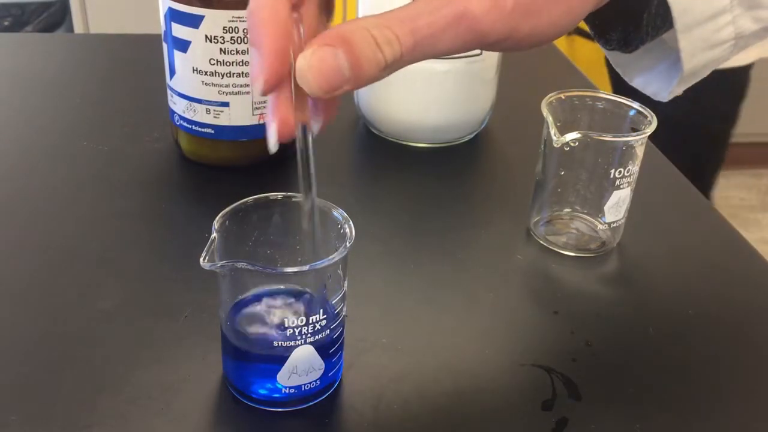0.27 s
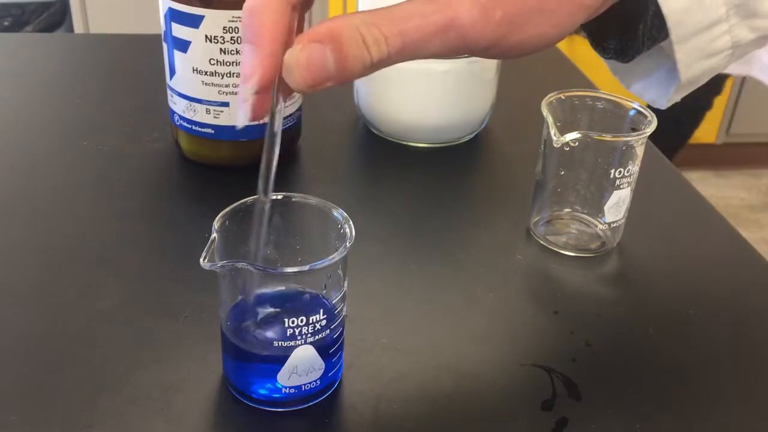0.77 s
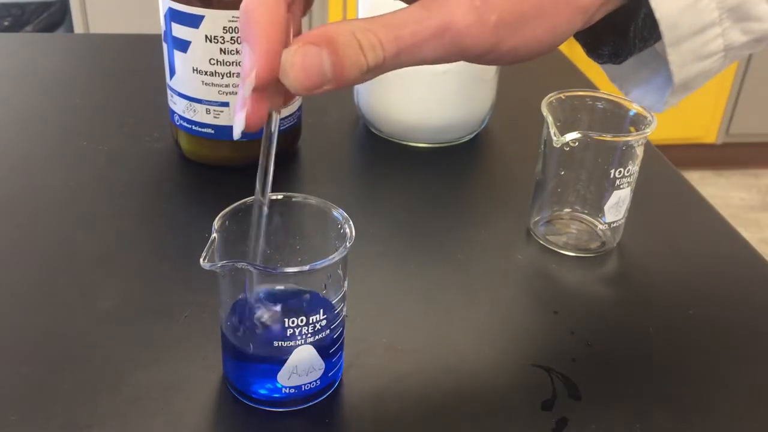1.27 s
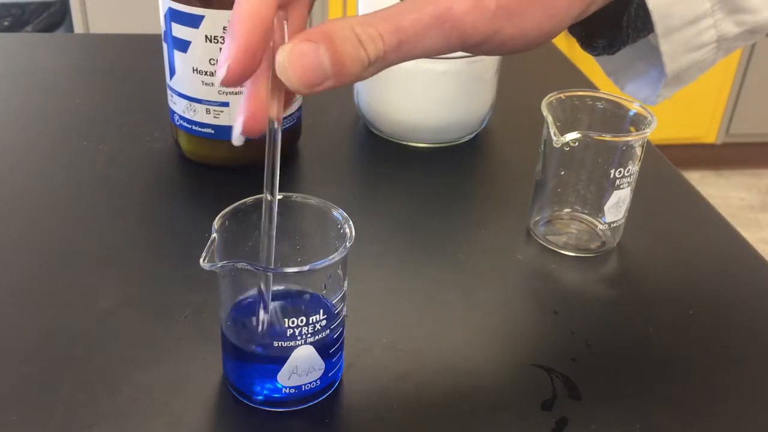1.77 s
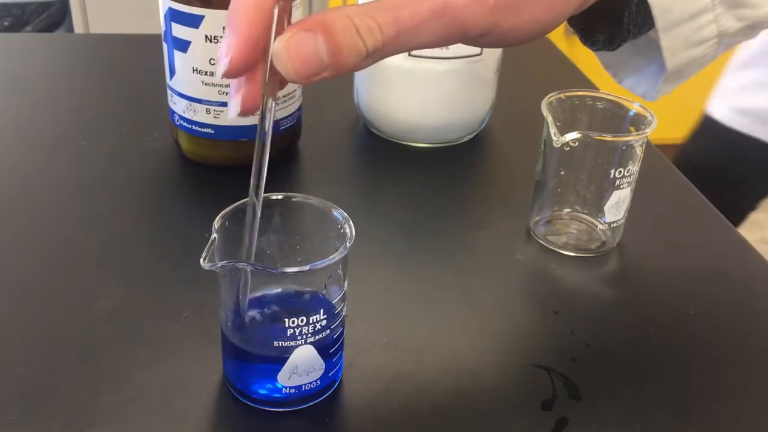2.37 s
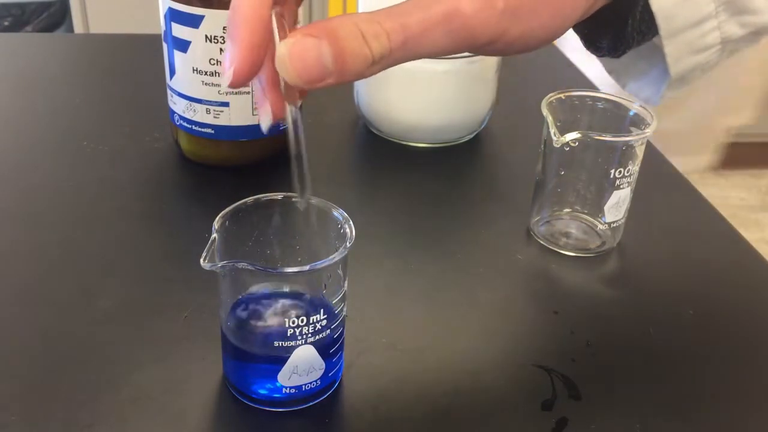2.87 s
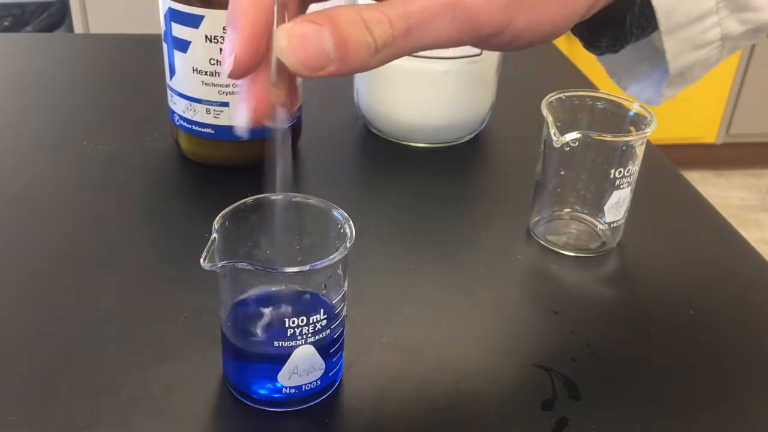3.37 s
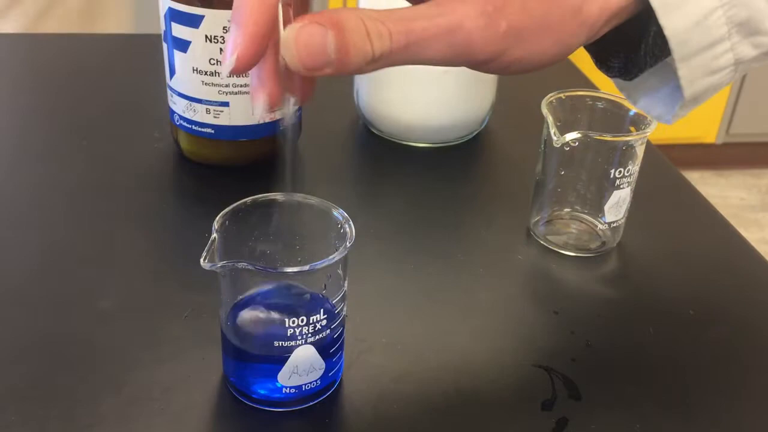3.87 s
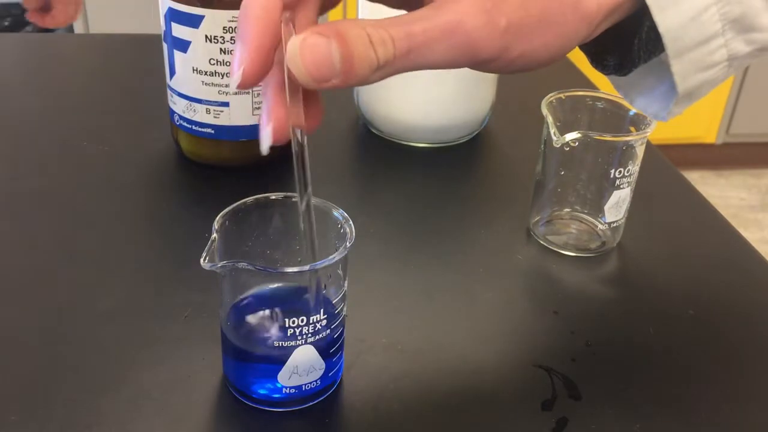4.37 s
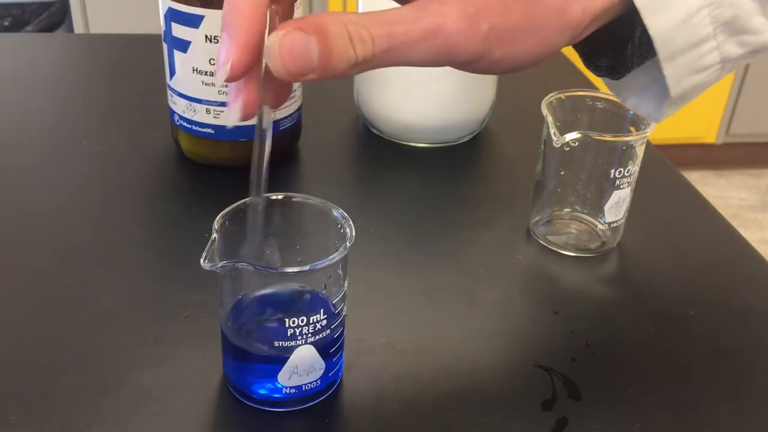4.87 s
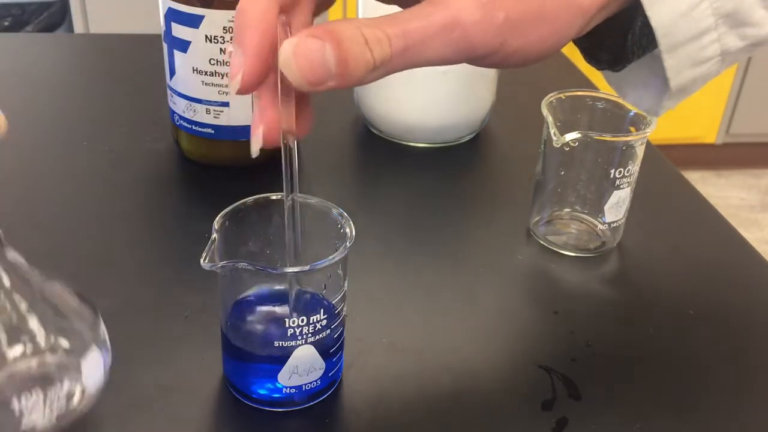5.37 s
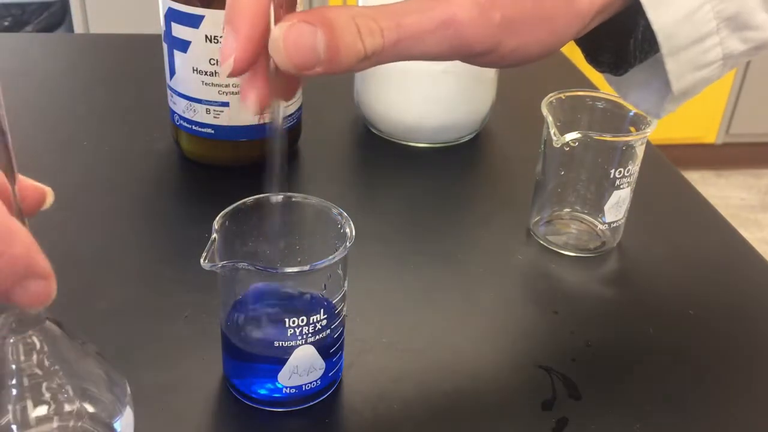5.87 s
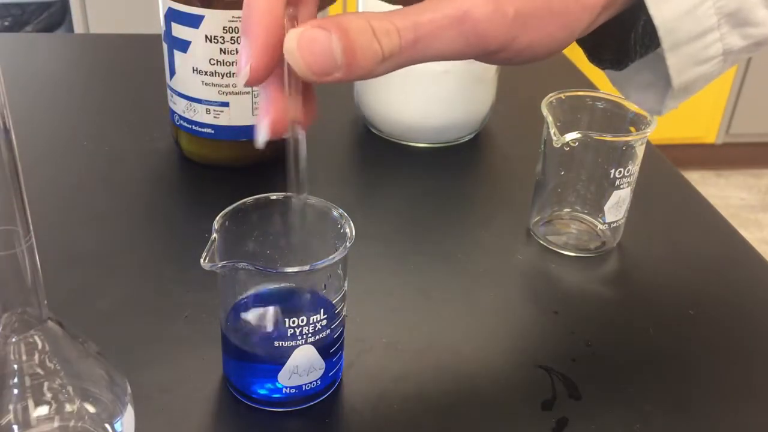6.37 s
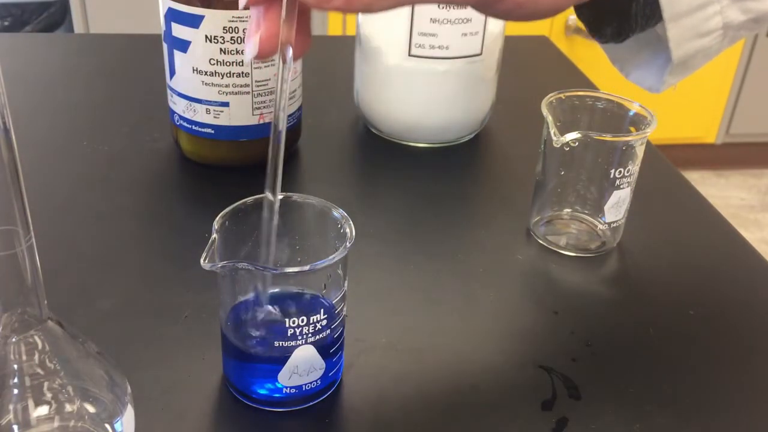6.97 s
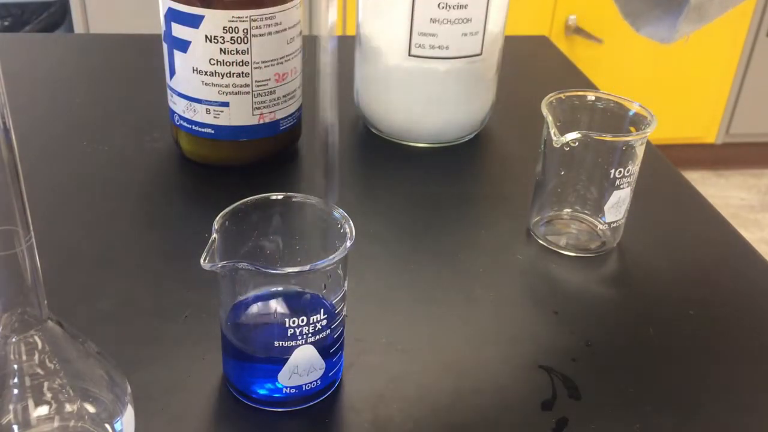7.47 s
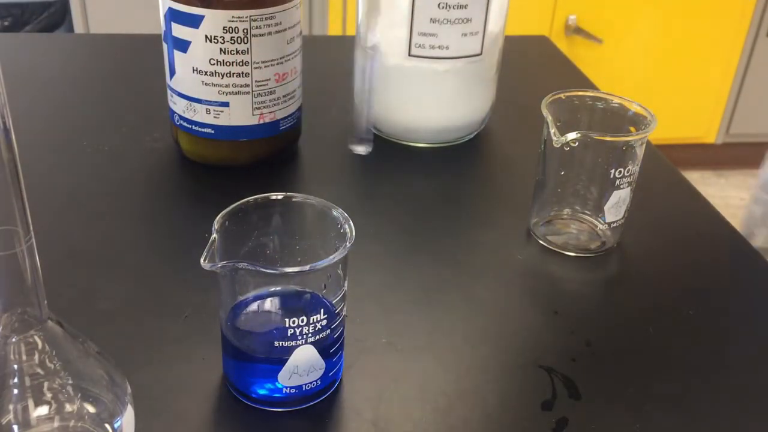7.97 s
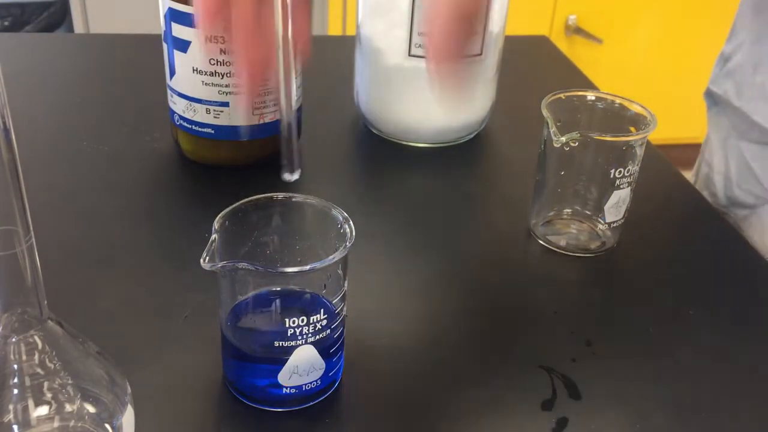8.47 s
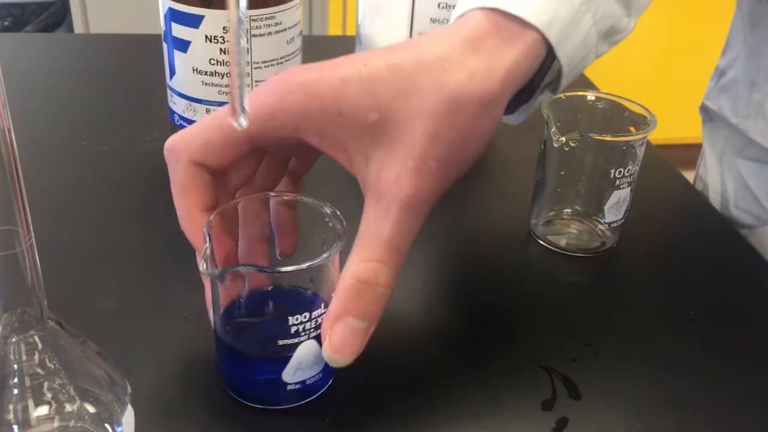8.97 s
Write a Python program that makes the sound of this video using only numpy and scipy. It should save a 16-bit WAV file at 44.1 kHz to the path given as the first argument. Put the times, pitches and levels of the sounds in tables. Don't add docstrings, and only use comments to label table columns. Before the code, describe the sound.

A glass rod clinks brightly and irregularly inside a liquid-filled beaker, then a glass flask lands hard and rocks on a bench in a humming lab.

```python
import sys
import numpy as np
from scipy import signal
from scipy.io import wavfile
from scipy.ndimage import uniform_filter1d

SR = 44100
rng = np.random.default_rng(int(sys.argv[2]) if len(sys.argv) > 2 else 0)


def volts_from_decibels(level):
    exponent = np.asarray(level, float) / 20
    return 10 ** exponent


def inscribe(sig):
    pcm = np.round(np.clip(np.atleast_2d(sig).T, -1, 1) * 32767)
    wavfile.write(sys.argv[1], SR, pcm.astype(np.int16))


N = 406602


def band(x, hz, octaves):
    edges = hz * 2 ** (-octaves / 2), min(hz * 2 ** (octaves / 2), .45 * SR)
    return signal.sosfilt(signal.butter(2, edges, "bandpass", fs=SR, output="sos"), x)


def walk(rate):
    hold = int(SR / rate)
    steps = np.repeat(rng.standard_normal(N // hold + 1), hold)
    return 1.4 * uniform_filter1d(uniform_filter1d(steps, hold), hold)[:N]


def wobble(x):
    return x * volts_from_decibels(4 * walk(110))


def lay(s, rows):
    where = np.minimum((s * SR).astype(int)[:, None] + np.arange(rows.shape[1]), N - 1)
    never_silent = np.resize([1e-14, 1e-14, -1e-14, -1e-14], N)
    return np.bincount(where.ravel(), rows.ravel(), N) + never_silent


def strike(s, db, ms, modes, scatter_db):
    n = np.arange(400)
    fade = np.exp(-(n * 1000 / SR / np.clip(ms, .05, 4)) ** 2)
    push = rng.standard_normal((len(s), len(n))) * fade
    luck = np.clip(rng.standard_normal((len(s), len(modes))), -1.5, 1.5)
    out = np.zeros(N)
    for (hz, mode_db, t60), chance in zip(modes, luck.T):
        radius = np.exp(-np.log(1000) / (max(t60, .003) * SR))
        w = 2 * np.pi * hz / SR
        content = np.abs(push @ np.exp(1j * w * n)) + .3 * np.sqrt(np.sum(push ** 2, axis=1))
        gain = volts_from_decibels(db + mode_db + scatter_db * chance) / content
        force = lay(s, push * gain[:, None])
        out += signal.lfilter([.5, 0, -.5], [1, -2 * radius * np.cos(w), radius * radius], force)
    return out


def choked(s, db, hz, mode_db, rise_ms, choke_ms, fade_s, size=600):
    t = np.arange(size) / SR
    luck = rng.random((len(s), np.shape(hz)[-1] + 1, 3))
    pitch = hz * (1 + .006 * (luck[:, 1:, 0] - .5))
    gain = volts_from_decibels(mode_db + 4 * (luck[:, 1:, 1] - .5))
    waves = np.sin(2 * np.pi * (pitch[..., None] * t + .15 * luck[:, 1:, 2:]))
    ring = np.sum(gain[..., None] * waves, axis=1)
    choke = choke_ms * (0.93 + 0.53 * luck[:, 0, :1])
    ring *= (1 - np.exp(-1000 * t / rise_ms)) * np.exp(-(1000 * t / choke) ** 6 - t / fade_s)
    return lay(s, ring / np.abs(ring).max(axis=1, keepdims=True) * volts_from_decibels(db)[:, None])


def burst(s, db, rise_ms, t60, hz, octaves):
    t = np.arange(SR // 4) / SR
    decay_s = np.clip(t60 + 0 * s, .01, .4)[:, None]
    shape = (1 - np.exp(-1000 * t / rise_ms)) * np.exp(-np.log(1000) * t / decay_s)
    grain = rng.standard_normal(N) * volts_from_decibels(3 * walk(200))
    body = band(band(grain * lay(s, shape * volts_from_decibels(db)[:, None]), hz, octaves), hz, octaves)
    return body * np.sqrt(SR / (hz * octaves))


# [f/Hz, t60/s]
ROOM_DECAY = [(300, 0.27), (1000, 0.45), (3000, 0.25), (7000, 0.4), (13000, 0.25)]


def room(x):
    t = np.arange(SR // 2) / SR

    def tail_band(hz, t60, octaves):
        return band(rng.standard_normal(len(t)), hz, octaves) * np.exp(-np.log(1000) * t / t60)

    tail = 30 * sum(tail_band(hz, t60, 1.57) / np.sqrt(hz) for hz, t60 in ROOM_DECAY[:2])
    tail = tail + sum(tail_band(hz, t60, 0.68) for hz, t60 in ROOM_DECAY[2:])
    tail *= np.clip(t / 0.00021, 0, 1)
    return signal.fftconvolve(x, tail / np.sqrt(np.sum(tail ** 2)))[:N]


# [f/Hz, level/dB per Hz]
AIR_SPECTRUM = [(30, -19), (48, -7.5), (121, -2), (208, -10), (553, -31), (900, -28), (4020, -36.5),
                (15200, -46.5)]
# [f/Hz, level/dB]
FAN_LINES = [(63, -65), (120, -65), (204, -68)]


def ventilation():
    hz, db = np.transpose(AIR_SPECTRUM)
    out, swell, gust = 0, walk(1.1), walk(9.5)
    for centre in 30 * 2 ** np.arange(0, 9.2, .5):
        shape_db = np.interp(np.log(centre), np.log(hz), db) + .8 * swell + 3.9 * walk(1.9)
        if centre < 300:
            shape_db += 2.4 * walk(10) + 2.1 * gust
        out = out + volts_from_decibels(shape_db) * band(rng.standard_normal(N), centre, 0.48)
    out *= volts_from_decibels(-56.5) / np.sqrt(np.mean(out ** 2))
    for line_hz, line_db in FAN_LINES:
        phase = 2 * np.pi * np.cumsum(line_hz * (1 + 0.05 * walk(14))) / SR
        out += np.sqrt(2) * volts_from_decibels(line_db + 3 * walk(11)) * np.sin(phase)
    return out


# [t/s, middle level/dB, low level/dB, high level/dB, t60/s]
FAR_KNOCKS = [(0.015, -52, -46.5, -82, 0.043), (0.465, -43, -33.5, -51, 0.077),
              (0.547, -65, -41.5, -70, 0.072), (0.664, -45, -42.5, -57, 0.16),
              (1.219, -72, -86, -61, 0.096), (1.868, -51, -61, -70, 0.075), (2.583, -64, -53, -49, 0.061),
              (2.818, -60, -84, -57, 0.052), (3.076, -58.5, -58, -90, 0.11),
              (3.372, -44.5, -52, -63, 0.074), (3.882, -51, -58, -82, 0.055),
              (4.024, -46, -56.5, -69, 0.059), (4.344, -53, -50.5, -89.5, 0.044),
              (4.503, -46.5, -62, -65, 0.13), (7.2, -78.5, -69.5, -74, 0.15), (7.501, -55.5, -63, -86, 0.1),
              (7.928, -53.5, -67, -76.5, 0.061), (8.677, -36, -44, -76, 0.079), (8.73, -48, -47, -90, 0.11),
              (9.021, -54, -54, -86, 0.062), (9.046, -35.5, -49.5, -80.5, 0.07),
              (9.119, -67, -62.5, -89.5, 0.11)]
# [f/Hz, level/dB, t60/s]
KNOCK_MODES = [(981, -2, 0.06), (1034, -8, 0.03), (1469, -6, 0.12), (1513, -1.5, 0.04), (1199, -10, 0.011),
               (762, -1.5, 0.033), (633, -10, 0.094), (3457, 3, 0.0051)]


def bumps():
    s, mid_db, low_db, high_db, t60 = np.transpose(FAR_KNOCKS)
    out = burst(s, low_db - 8.5, 8.9, 2.3 * t60, 200, 2.1)
    out += burst(s, mid_db - 7.0, 5.5, t60, 885, 1.7)
    out += burst(s, high_db - 4.5, 0.75, 2.1 * t60, 3500, 0.71)
    out += burst(s, mid_db - 18.0, 3.6, 1.2 * t60, 2500, 0.78)
    out += burst(s, high_db - 11, 1.8, 2.5 * t60, 7720, 1.0)
    return out + wobble(strike(s, mid_db - 18, 4.2, KNOCK_MODES, 3))


# [t/s, f/Hz, level/dB, t60/s]
FAR_GLASS = [
    (0.47, 2500, -55, 0.14),
    (.471, 2700, -73, 0.17),
    (1.6, 5400, -66, 0.13),
    (2.815, 4040, -60.5, 0.81),
    (4.03, 4080, -70, 0.21),
    (4.19, 8000, -80, 0.12),
    (7.2, 4000, -72, 0.32),
    (2.6, 3400, -69, 0.42),
    (2.585, 3800, -60.5, .2),
    (2.6, 3550, -68, 0.28),
]


def tinks():
    at, hz, db, ring = (c[:, None] for c in np.transpose(FAR_GLASS))
    t = np.arange(SR // 4) / SR
    split = np.sin(2 * np.pi * hz * t)
    split += .7 * np.sin(2 * np.pi * 1.017 * hz * t) + .5 * np.sin(2 * np.pi * .97 * hz * t)
    envelope = volts_from_decibels(db - 60 * t / ring - (t / 0.11) ** 4.5) * np.clip(t / 0.003, 0, 1)
    echo = sum(burst(a, d - 9, 3.5, np.minimum(r, .3), f[0], .07)
               for a, f, d, r in zip(at, hz, db, ring) if f[0] < 4200)
    return echo + wobble(wobble(lay(at[:, 0], envelope * split)))


# [t/s, hiss level/dB, rub level/dB]
BRUSHES = [
    (7.75, -70, -90),
    (7.832, -63, -61),
    (8.025, -68, -58),
    (8.266, -94.5, -66.5),
    (8.43, -69.5, -80.5),
]


def sleeve():
    s, hiss_db, rub_db = (c[:, None] for c in np.transpose(BRUSHES))
    late = np.arange(int(7.5 * SR), int(9 * SR)) / SR - s
    shape_db = np.minimum(208 * late, -176 * late)
    grain = rng.standard_normal(N) * volts_from_decibels(2.1 * walk(160))

    def cloth(db, hz, octaves):
        level = volts_from_decibels(db + shape_db).sum(axis=0, keepdims=True)
        return band(grain * lay(np.array([7.5]), level), hz, octaves)

    return cloth(hiss_db + 0.72, 6000, 2.6) + cloth(rub_db + 10.5, 1150, 1.2)


# [t/s, level/dB]
DRAG_PATH = [
    (5.5, -84),
    (5.587, -43),
    (5.74, -72),
    (5.8, -35),
    (5.864, -38),
    (6.07, -48.5),
    (6.17, -43),
    (6.19, -79),
    (6.499, -55),
]


def drag():
    t, scrape_db = np.transpose(DRAG_PATH)
    rumble_db = scrape_db + 9.5 - 12 * (t - t[0])
    grain = rng.standard_normal(N) * volts_from_decibels(2.4 * walk(60) + 1.0 * walk(240))

    def grind(db, hz, octaves):
        return band(grain * volts_from_decibels(np.interp(np.arange(N) / SR, t, db, -120, -120)), hz, octaves)

    return grind(scrape_db + 2.5, 1000, 1.8) + grind(rumble_db, 310, .9)


# [t/s, thud level/dB, glass level/dB, neck level/dB]
FOOT_HITS = [
    (5.789, -11.5, -16, -38),
    (5.982, -26.5, -35, -73),
    (6.093, -26.5, -38, -55),
    (6.148, -25.5, -29, -52),
    (6.204, -34.5, -46, -78),
    (6.25, -32, -36, -56),
    (6.283, -26, -38.5, -61.5),
    (6.311, -32.5, -56, -82),
]
BENCH_PITCHES = [549, 598, 770, 845, 997, 1120, 1233, 1497, 1615, 1906, 2275, 2493]
# [level/dB, t60/s]
BENCH_RINGS = [(2, 0.14), (0, 0.19), (0, 0.17), (-8.5, 0.077), (3.5, 0.098), (-8.5, 0.096), (-6, 0.12),
               (-1, 0.19), (-1.5, .11), (-10.5, 0.058), (-4.5, 0.055), (-5.5, 0.076)]


def bench_thud():
    s, thud_db, _, _ = np.transpose(FOOT_HITS)
    top = [(hz, db, t60) for hz, (db, t60) in zip(BENCH_PITCHES, BENCH_RINGS)]
    thud = band(strike(s, thud_db - 16.5, 0.61, top, 2.5), 1000, 4.04)
    thud += burst(s, thud_db - 9, 1.5, 0.083, 750, 1.78)
    return thud + burst(s[:1], thud_db[:1] - 27.0, 0.62, .07, 230, 0.95)


LANDING_DELAYS = np.array([.001, .009])
LANDING_LEVELS = np.array([0, -9])
# [f/Hz, level/dB, t60/s]
FLASK_MODES = [(2372, 3, 0.033), (2745, -14, .3), (1618, -3, .13), (3430, -7.5, .045), (3941, -19.5, .15),
               (5420, -7.5, 0.25), (5380, -11.5, 0.13), (5400, -15.5, .15), (7250, -6.5, .012),
               (2093, -7, .1), (9798, -25.5, 0.4), (9670, -25.5, 0.16), (9900, -17.5, .12),
               (9300, -21.5, .15)]
# [f/Hz, level/dB, t60/s]
ROCK_MODES = [(2820, -13.5, 0.2), (2670, -3.5, 0.067), (3840, -28, 0.046), (5900, -11, 0.028),
              (5390, -18, 0.073), (1535, -6, 0.069), (2370, -16, 0.039), (3340, -25.5, .02)]
# [f/Hz, level/dB, t60/s]
NECK_MODES = [(8520, 2.5, 0.25), (10240, 4, 0.09), (13500, -26, .1)]


def flask():
    s, _, glass_db, neck_db = np.transpose(FOOT_HITS)
    touches, touch_db = s[0] + np.array(LANDING_DELAYS), glass_db[0] + np.array(LANDING_LEVELS)
    landing = volts_from_decibels(1.8 * walk(150)) * strike(touches, touch_db - 1.5, 0.13, FLASK_MODES, 0)
    snap = [(2516, 1, .004), (5160, -4, .004)]
    landing += strike(touches, touch_db + 5.5, 0.051, snap, 0)
    first, first_db = s[:1], glass_db[:1]
    landing += burst(first, first_db - 28.5, 2.5, .35, 2600, 1.4)
    landing += burst(first, first_db - 29.5, 1.6, .25, 9900, .12)
    landing += burst(first, first_db - 19.5, 0.79, .17, 2200, 5.1)
    landing += burst(first, neck_db[:1] - 13.5, .2, .07, 11000, 1.1)
    rocks = strike(s[1:], glass_db[1:] - 1.0, 4.6, ROCK_MODES, 2.5)
    rocks += strike(s[1:], neck_db[1:] - 6.5, 1.6, NECK_MODES, 2.5)
    rocks += burst(s[1:], glass_db[1:] - 40.0, 0.35, 0.027, 3800, 1.5)
    return landing + wobble(rocks)


# [t/s, level/dB, length/ms]
ROD_SLIDES = [
    (0.68, -32, 18.5),
    (1.331, -66.5, 37),
    (1.492, -44, 19),
    (1.79, -74, 12),
    (5.66, -74, 14),
    (7.73, -85.5, 61),
]


def slide():
    at, slide_db, ms = np.transpose(ROD_SLIDES)
    rubbing = lay(at, volts_from_decibels(slide_db)[:, None] * (np.arange(4096) < ms[:, None] * SR / 1000))
    stick_slip = uniform_filter1d(rubbing, size=256) * rng.standard_normal(N) * volts_from_decibels(4 * walk(900))
    return band(stick_slip, 13100, .12) * 4 + band(stick_slip, 8800, .25) * 2 + band(stick_slip, 6000, 1.8) * .5


# [t/s, clink level/dB, low wall level/dB re clink, shove level/dB, bowl level/dB]
ROD_STROKES = [(0.172, -12.5, -18, -48, -88), (0.3744, -39, -9, -36.5, -53.5),
               (0.678, -18.5, -10, -40, -67), (1.064, -32, -0.5, -28.5, -48.5),
               (1.4843, -14.5, -13, -39, -75), (1.9153, -24, -8, -26.5, -66.5),
               (2.0338, -21, -8, -49.5, -74), (2.1565, -13.5, -10, -41, -70.5), (2.3044, -13, -9, -44, -52),
               (2.4608, -15, -14.5, -48, -75), (2.6093, -16, -11.5, -47, -78),
               (2.924, -15.5, -10, -44, -58.5), (3.3975, -10.5, -9.5, -39, -53),
               (4.6541, -13.5, -13, -43, -82.5), (4.7958, -40, 5, -30, -46.5),
               (4.9418, -17, -10.5, -54.5, -70), (5.3307, -10, -17.5, -39.5, -56),
               (5.4964, -33, -7.5, -32, -51.5), (5.684, -11, -14.5, -41.5, -58),
               (6.0688, -26.5, -1, -70, -63), (6.4775, -20, -17.5, -56, -70),
               (6.6802, -15.5, -11.5, -42, -57), (6.8072, -14.5, -11.5, -40.5, -48),
               (7.7222, -33, -4, -55, -51.5)]
# [t/s, rim level/dB, waist level/dB, collar level/dB]
RINGS_OF_STROKES = [(0.1714, -42.5, -48, -53), (0.3735, -44, -44, -41.5), (0.6764, -30, -32, -37.5),
                    (1.063, -31, -54, -36.5), (1.4834, -36.5, -40.5, -49), (1.9144, -37, -42.5, -39),
                    (2.0338, -37.5, -44.5, -69), (2.1555, -33.5, -40.5, -54), (2.3062, -33, -38, -49),
                    (2.4604, -47.5, -41, -58), (2.6084, -34.5, -40.5, -48), (2.9257, -36.5, -38, -55),
                    (3.3972, -38, -41.5, -55), (4.6553, -41.5, -47, -65), (4.796, -34, -41, -43),
                    (4.9412, -45, -51.5, -62), (5.3303, -37, -46, -61), (5.4954, -34.5, -40.5, -38),
                    (5.684, -38.5, -44, -54), (6.0681, -45, -45, -71), (6.4767, -50, -43, -66),
                    (6.6797, -43, -40, -61), (6.8069, -39, -34, -54), (7.7218, -40, -56, -71)]
# [t/s, clink level/dB, low wall level/dB re clink, rim level/dB]
ROD_BOUNCES = [(0.1817, -22.5, -11, -58.5), (0.522, -37, -11, -55), (.6824, -37, -14, -28.5),
               (.6941, -37, -15, -43), (1.508, -24.5, -10.5, -45), (1.9022, -33.5, -1, -28),
               (2.1874, -29.5, -1.5, -52.5), (2.3219, -24.5, -8, -45.5), (2.4912, -26, -14, -70),
               (2.5047, -54, 7, -69), (2.6213, -19, -12, -37.5), (2.9443, -28, -8, -48.5),
               (3.1641, -43, -0.3, -56), (3.4377, -27.5, 1.5, -60), (3.467, -34.5, -1.5, -52),
               (4.6846, -21, -10, -42.5), (4.6952, -34.5, -3.5, -49), (4.9536, -27.5, -6, -59),
               (5.3625, -21, -11.5, -46), (5.375, -38, -2, -62.5), (5.723, -27.5, -6.5, -56),
               (5.7418, -40, -4, -61.5), (6.5022, -24, -9.5, -39.5), (6.8237, -29, -4, -57)]
# [t/s, clink level/dB, rim level/dB, bench knock level/dB]
ROD_GRAZES = [(0.038, -49, -55.5, -74), (.338, -56, -50, -72), (.6904, -36.5, -39, -33.5),
              (1.295, -59, -78, -72), (1.3195, -62, -53, -40.5), (1.519, -25.5, -70, -37.5),
              (1.5737, -48, -56.5, -47), (1.672, -56, -91, -56.5), (1.708, -49, -74, -64),
              (1.7197, -43.5, -56.5, -63), (1.785, -64, -88, -62), (4.0054, -45.5, -78, -55),
              (4.4802, -45.5, -57, -62.5), (4.514, -61, -52, -56), (4.5376, -40.5, -52, -42.5),
              (5.0722, -58.5, -84.5, -83), (5.2674, -45.5, -55.5, -47), (6.084, -40.5, -55, -54),
              (8.9556, -60, -57.5, -75.5), (8.97, -52, -88, -77), (.83, -55, -69, -77),
              (1.008, -62, -70, -80), (1.835, -71, -85, -78), (3.174, -52, -67, -80),
              (3.478, -43.5, -68.5, -78.5), (4.801, -30, -54, -44), (6.512, -37.5, -53, -67.5),
              (6.811, -31, -43, -57), (6.833, -37, -49, -71)]


def contacts():
    s, clink, low, shove, bowl = np.transpose(ROD_STROKES)
    _, rim, waist, collar = np.transpose(RINGS_OF_STROKES)
    strokes = s, clink, clink + low, rim, bowl, shove, waist, collar
    s, clink, low_re_clink, rim = np.transpose(ROD_BOUNCES)
    low, knock = clink + low_re_clink, rim - 9
    bounces = s, clink, low, rim, rim - 21, knock, low - 17, knock - 18.5
    s, clink, rim, knock = np.transpose(ROD_GRAZES)
    low = clink - 8
    grazes = s, clink, low, rim, rim - 12.5, knock, low - 17, knock - 8
    return np.hstack([strokes, bounces, grazes])


def bench_knock(s, knock_db):
    knock = 0
    for k in range(3):
        modes = [(hz * (1 + .06 * rng.uniform(-.5, 0.55)), db, t60) for hz, db, t60 in KNOCK_MODES]
        knock = knock + wobble(strike(s[k::3] + 0.00092, knock_db[k::3] - 5.5, 3.5, modes, 3))
    return knock + burst(s, knock_db - 7.0, 9.9, 0.05, 1000, 1.64)


# [t/s, bowl level/dB, collar level/dB]
FINGERS = [
    (8.68, -55, -80),
    (8.955, -63.5, -88),
    (9.046, -46, -74),
    (9.077, -82, -66),
    (9.106, -79, -61),
]


def bowl_ring(s, bowl_db):
    at, grip_db, _ = np.transpose(FINGERS)
    hz = 2390
    ring = choked(s, bowl_db - 5.5, hz + np.array([0, 25]), np.array([0, -15.]), 7, 190,
                  0.33 / np.log(1000), size=9000)
    return volts_from_decibels(3.9 * walk(90)) * (ring + strike(at, grip_db, 1.4, [(hz, 0, .22)], 0))


# [f/Hz, level/dB, t60/s]
COLLAR_MODES = [(4325, -1, 0.11), (4355, -6.5, 0.084)]


def collar_ring(s, collar_db):
    at, _, grip_db = np.transpose(FINGERS)
    return strike(np.append(s, at), np.append(collar_db - 0.5, grip_db), 2.0, COLLAR_MODES, 1.2)


WAIST_PITCHES = [5390, 5470, 5600, 5770]


def waist_ring(s, waist_db):
    hz = np.outer(1 + .016 * (rng.random(len(s)) - .4), WAIST_PITCHES)
    mode_db = np.array([-3.0, 1.5, -5.5, -8.0])
    ring = choked(s, waist_db + 6.0, hz, mode_db, 0.34, 130, 0.0065, size=3000)
    return ring + burst(s, waist_db - 15, 2.2, 0.14, 5430, .09)


# [f/Hz, level/dB, t60/s]
RIM_MODES = [(6200, -3, .17), (6245, -3, .2), (6290, -8, .04)]


def rim_ring(s, rim_db):
    return volts_from_decibels(3.5 * walk(70)) * strike(s, rim_db - 2.5, 0.3, RIM_MODES, 1.2)


UPPER_PITCHES = [12990, 13340, 11200, 14740, 15400, 12500]
UPPER_LEVELS = [0, 0, 0, -14, -22, -20]
SHOULDER_PITCHES = [9400, 7000]
LOWER_LEVELS = [0, 0, -16, -22]
# [upper pair tilt/dB, lower mode f/Hz, side level/dB re lower, middle level/dB re upper]
SPOTS_OF_STROKES = [(9, 9030.0, 0, -16), (-3, 8950.0, 7, -18), (9, 9190.0, -5, -18), (4, 8860.0, -1, -12),
                    (4, 9250.0, -3, -18), (-4, 9100.0, -7, -13), (-10, 9020.0, -7, -19),
                    (5, 8940.0, -15, -22), (-12, 9080.0, -19, -16), (9, 9080.0, -18, -14),
                    (-9, 9050.0, -11, -19), (-8, 8990.0, -20, -18), (-1, 9120.0, -18, -18),
                    (1, 9080.0, 2, -14), (6, 8990.0, 8, -16), (4, 9020.0, -14, -14), (-7, 9190.0, -3, -21),
                    (-8, 9010.0, 10, -9), (-12, 9000.0, -17, -26), (-2, 9110.0, -1, -11),
                    (5, 8880.0, -11, -14), (-11, 9080.0, -24, -23), (-14, 9210.0, -6, -15),
                    (-1, 9220.0, 7, -6)]
SPOTS_OF_BOUNCES = [(6, 9140.0, -1, -14), (0, 9110.0, 9, -10), (11, 9170.0, -2, -21), (-2, 9100.0, 11, -19),
                    (1, 8980.0, -7, -14), (-9, 8840.0, 2, -21), (5, 9040.0, -10, -9),
                    (-7, 8980.0, -13, -15), (6, 9000.0, -22, -19), (1, 9030.0, -18, -11),
                    (-11, 8990.0, -13, -21), (-8, 9000.0, -7, -13), (-3, 9130.0, -4, -15),
                    (1, 9090.0, -19, -13), (-4, 9110.0, -8, -9), (-9, 9040.0, 0, -17),
                    (-4, 9120.0, 11, -19), (-4, 9110.0, 0, -13), (-5, 8870.0, -7, -17),
                    (-4, 8910.0, -5, -18), (-3, 8900.0, -19, -12), (1, 8890.0, -5, -21),
                    (-8, 9130.0, -4, -19), (-1, 9170.0, -12, -9)]
SPOT_OF_GRAZES = (-3, 9060, -4, -14)


def clinks(s, upper_db, lower_db):
    graze_spots = [SPOT_OF_GRAZES] * len(ROD_GRAZES)
    tilt, low_hz, side_db, mid_db = np.vstack([SPOTS_OF_STROKES, SPOTS_OF_BOUNCES, graze_spots]).T
    one, none, side_hz = np.ones(len(s)), np.zeros(len(s)), 8110
    pair = np.minimum(tilt, 0), np.minimum(-tilt, 0)
    upper = np.array(UPPER_LEVELS) + np.transpose([*pair, mid_db, none, none, none])
    lower_hz = np.transpose([low_hz, side_hz * one, *np.outer(SHOULDER_PITCHES, one)])
    lower = np.array(LOWER_LEVELS) + np.transpose([none, side_db, none, none])
    wall = choked(s, upper_db + 0.9, np.array(UPPER_PITCHES), upper, 0.27, 4.6, 0.002)
    wall += choked(s, lower_db + 5, lower_hz, lower, 0.32, 7.8, 0.0032)
    side_ring_db = lower_db + np.minimum(side_db, 3) - 17.5
    return wall + wobble(strike(s, side_ring_db, 0.083, [(side_hz, 0, .12)], 2.5))


# [f/Hz, level/dB, t60/s]
WALL_MODES = [(9000, -10.5, 0.07), (8940, -12, 0.08), (9600, -15.5, .05), (14700, -17, 0.04),
              (13200, -12.5, .1), (12910, -15.5, 0.092), (2890, -10.5, 0.015), (4000, -22, 0.0082)]


def wall_ring(s, upper_db, lower_db, knock_db):
    ring = wobble(strike(s, knock_db - 8.0, .1, [(8500, 0, 0.072)], 2.5))
    ring += wobble(strike(s, (upper_db + lower_db) / 2 - 11.5, .1, WALL_MODES, 2.5))
    crack = burst(s, upper_db - 17.0, .15, .02, 8800, 0.5)
    return ring + crack + burst(s, lower_db - 24, 0.12, 0.021, 4600, 1.5)


def beaker():
    s, upper_db, lower_db, rim_db, bowl_db, knock_db, waist_db, collar_db = contacts()
    wall = clinks(s, upper_db, lower_db) + wall_ring(s, upper_db, lower_db, knock_db)
    body = wobble(waist_ring(s, waist_db) + collar_ring(s, collar_db))
    glass = wall + rim_ring(s, rim_db) + body + bowl_ring(s, bowl_db) + slide()
    return glass, bench_knock(s, knock_db)


def scene():
    air, far, cloth = ventilation(), bumps() + tinks(), sleeve()
    glass, thud = flask(), bench_thud() + drag()
    clink, knock = beaker()
    sends = volts_from_decibels(-18.5) * clink + volts_from_decibels(-8.5) * knock + volts_from_decibels(-28.5) * glass + volts_from_decibels(-5.5) * thud + volts_from_decibels(-1.0) * far
    return (clink + knock + glass + thud + volts_from_decibels(1.0) * far + room(sends) + cloth + air)[None]


def top_cut(x):
    return signal.sosfilt(signal.butter(12, 17150, fs=SR, output="sos"), x)


def record(dry):
    ceiling = .5
    rounded = ceiling * np.tanh(dry / ceiling)
    cut = signal.sosfilt(signal.cheby1(10, .5, 15900, fs=SR, output="sos"), rounded)
    return top_cut(cut)


dry = scene()
out = record(dry)
inscribe(out)
```